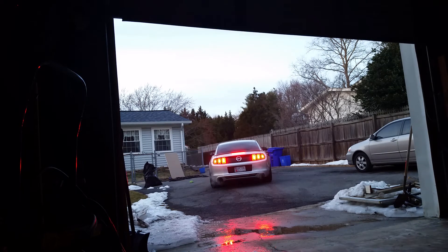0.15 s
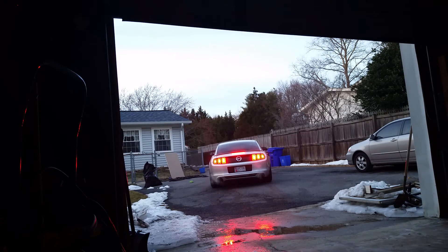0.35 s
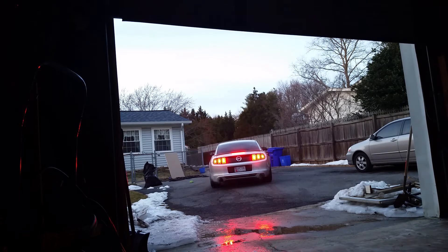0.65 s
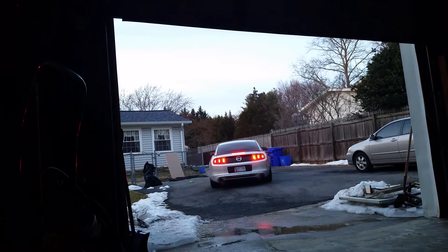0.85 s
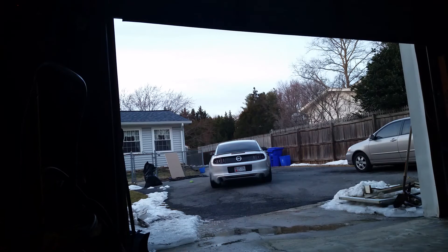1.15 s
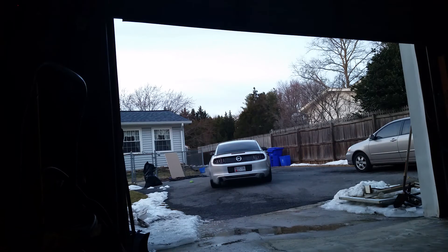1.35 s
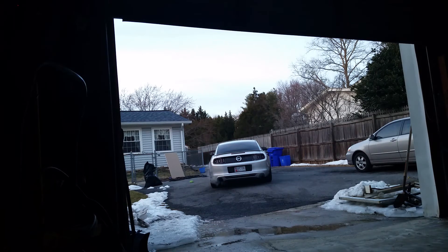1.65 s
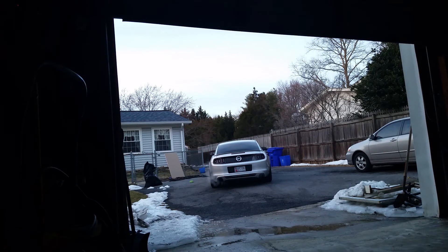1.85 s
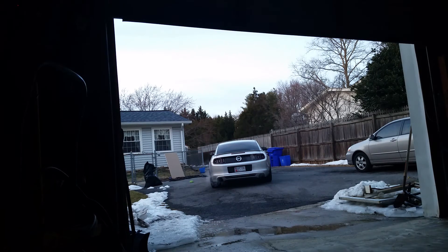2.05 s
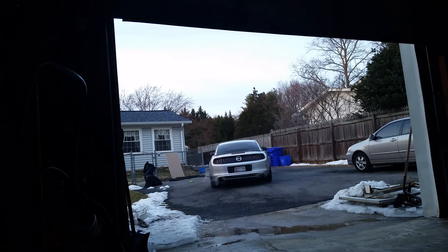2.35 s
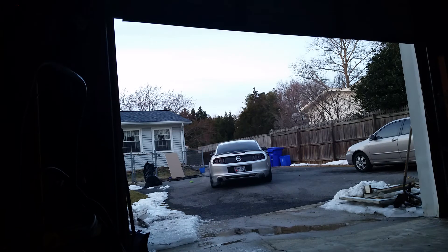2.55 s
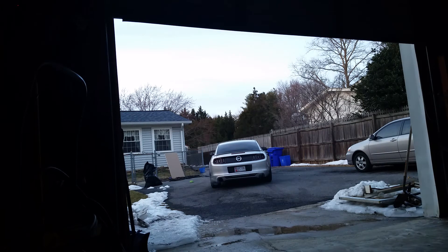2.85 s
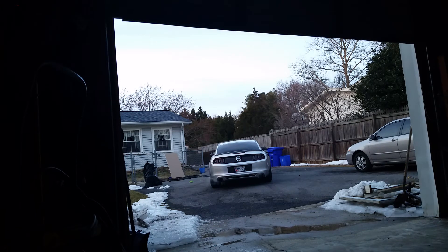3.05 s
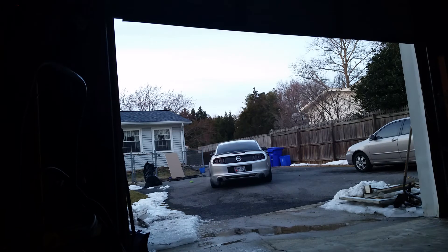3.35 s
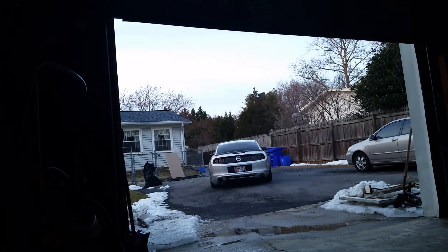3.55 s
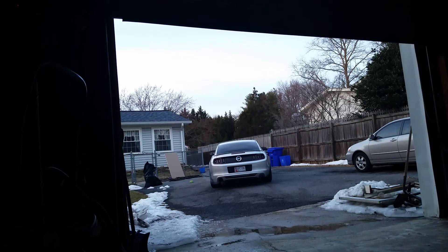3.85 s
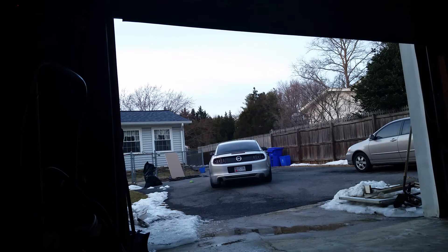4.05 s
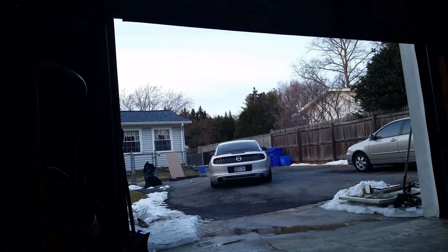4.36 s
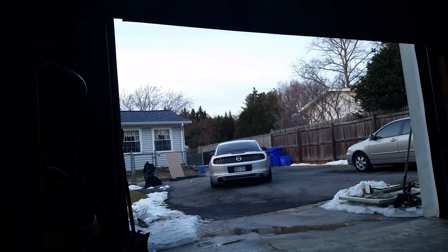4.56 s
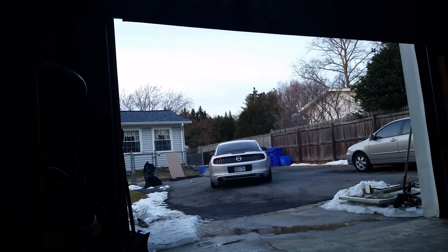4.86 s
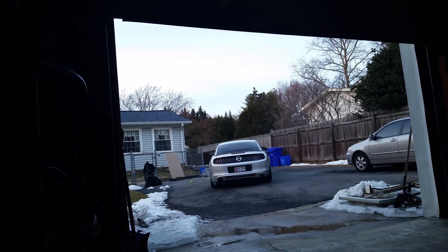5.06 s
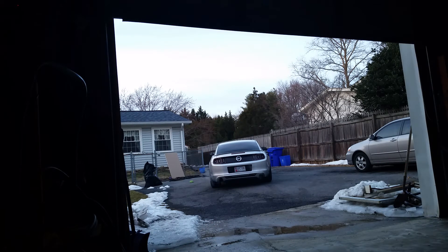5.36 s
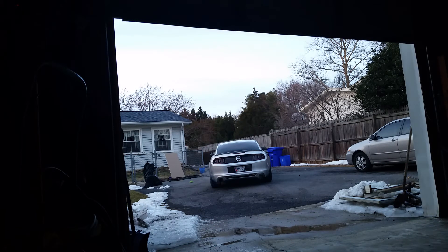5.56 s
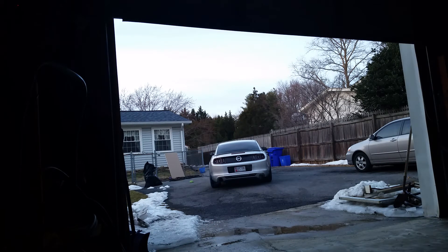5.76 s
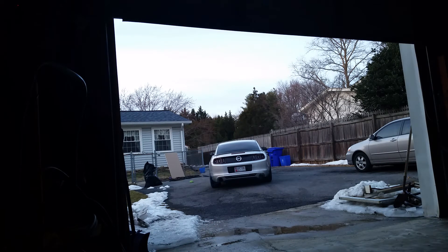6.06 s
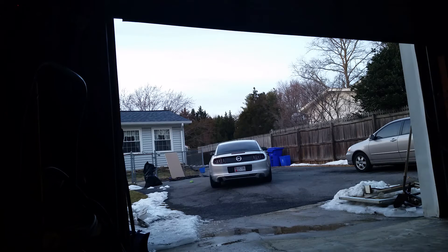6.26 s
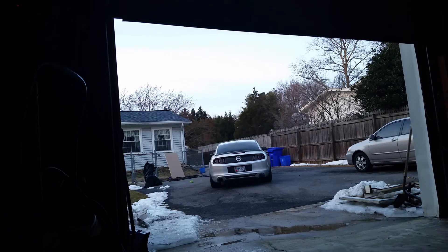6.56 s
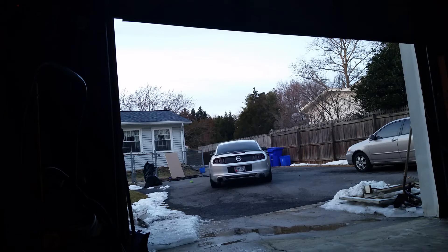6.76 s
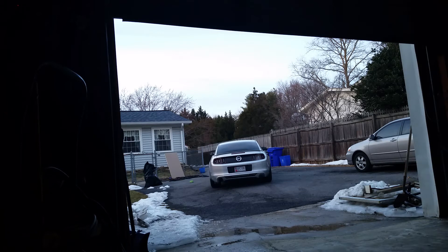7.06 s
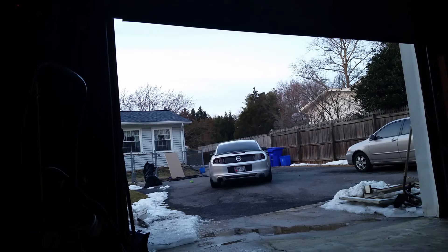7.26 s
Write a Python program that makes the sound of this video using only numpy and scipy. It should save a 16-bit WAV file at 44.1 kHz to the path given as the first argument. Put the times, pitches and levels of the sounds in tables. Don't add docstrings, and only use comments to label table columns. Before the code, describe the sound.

Heard from inside an open garage, a big eight-cylinder car in the driveway holds a fast, throaty idle for about two seconds, then slows to a steady lumpy rumble. Deep boom dominates, with uneven beats, dull exhaust roar, soft knocks and short hissing spits at the tailpipes. Low frequencies sit near the centre while roar and hiss spread wide; the engine runs throughout.

```python
import sys
import numpy as np
from scipy import signal
from scipy.fft import rfft, irfft, next_fast_len
from scipy.io import wavfile
from scipy.ndimage import uniform_filter1d

SR = 44100
rng = np.random.default_rng(int(sys.argv[2]) if len(sys.argv) > 2 else 0)


def unload_wav(signal):
    wavfile.write(
        sys.argv[1],
        SR,
        np.round(np.clip(np.atleast_2d(signal).T, -1, 1) * 32767).astype(np.int16),
    )


def amplitude_ratio(level_db):
    exponent = np.asarray(level_db, float) / 20
    return 10 ** exponent


N = 326781


def evened(x):
    return x / np.sqrt(np.mean(x ** 2) + 1e-20)


def read(points, hz):
    f, value = np.transpose(points)
    return np.interp(np.log(hz + 1), np.log(f + 1), value)


def curves(rows):
    s, *columns = np.transpose(rows)
    return [np.interp(np.arange(N) / SR, s, column) for column in columns]


def swells(rows):
    t = np.arange(0, N / SR + .01, .002)
    total_db = sum(db * np.exp(-((t - s) / half_s) ** 2) for s, db, half_s in rows)
    return np.interp(np.arange(N) / SR, t, total_db)


def settling():
    settle_s = 1
    return np.exp(-np.arange(N) / SR / settle_s)


def coloured(x, points, size=32768):
    log_gain = np.log(amplitude_ratio(read(points, abs(np.fft.fftfreq(size, 1 / SR)))))
    response = np.exp(np.conj(signal.hilbert(log_gain)))
    taps = np.fft.ifft(response).real[:size // 2]
    return evened(signal.oaconvolve(x, taps[None], axes=1)[:, :N])


# frequency in Hz, left minus right in dB.
TILT_DB = [(70, -2.7), (98, -1.6), (125, -.7), (170, -1.8), (240, .9), (340, 4.6), (500, 2.2), (1250, 3.6),
           (3500, .3), (5600, 0), (6600, -6), (7400, 7), (9000, 8), (9800, -.4)]
# frequency in Hz, left lead in radians.
LEAD_RAD = [(70, .08), (98, .24), (125, .19), (170, .05), (240, .34), (340, .42)]


def ports(x):
    size = next_fast_len(N + SR)
    hz = np.fft.rfftfreq(size, 1 / SR)
    half = amplitude_ratio(read(TILT_DB, hz) / 2) * np.exp(.5j * read(LEAD_RAD, hz))
    return irfft(rfft(x, size) * np.array([half, 1 / half]), size)[:, :N]


# frequency in Hz, correlation from 0 to 1.
LIKENESS = [(300, .9), (500, .74), (800, .64), (1250, .43), (1900, .05), (3500, .38), (11000, .2)]


def noise(points, patchy_db):
    frames, hz = N // 128 + 5, np.fft.rfftfreq(512, 1 / SR)
    a, b, c, d, patches = rng.standard_normal((frames, 257, 5)).T
    patches = uniform_filter1d(patches, size=5, axis=0)
    patches = evened(uniform_filter1d(patches, size=12, axis=1))
    same = np.clip(read(LIKENESS, hz), -1, 1)[:, None]
    left = a + 1j * b
    right = same * left + np.sqrt(1 - same ** 2) * (c + 1j * d)
    outside = (hz < points[0][0]) | (hz > points[-1][0])
    level_db = np.where(outside, -99, read(points, hz))[:, None]
    tilt_db = read(TILT_DB, hz)[:, None] * [[[.5]], [[-.5]]]
    z = np.array([left, right]) * amplitude_ratio(level_db + patchy_db * patches + tilt_db)
    return evened(signal.istft(z, nperseg=512, noverlap=384)[1][:, :N])


# time in seconds, firings a second.
SPEED = [(0.0, 41.47), (0.2, 43.39), (0.45, 46.07), (0.7, 47.06), (1.0, 47.65), (1.3, 48.38), (1.6, 48.99),
         (1.9, 48.18), (2.15, 48.19), (2.35, 45.07), (2.55, 41.93), (2.75, 41.17), (3.0, 41.23),
         (3.3, 41.39), (3.6, 41.97), (3.9, 42.02), (4.2, 42.03), (4.5, 42.23), (4.8, 41.83), (5.1, 42.02),
         (5.4, 41.96), (5.7, 41.53), (6.0, 41.82), (6.3, 42.05), (6.6, 42.62), (6.9, 42.47), (7.15, 42.56),
         (7.41, 43.98)]
CYLINDERS = [1.1, -0.59, 2.2, -0.25, 1.5, -0.79, -0.53, 1.5]


def firings():
    turned_at_start = .15
    count = np.cumsum(curves(SPEED)[0]) / SR + turned_at_start
    return count, np.flatnonzero(np.diff(np.floor(count)))


# time in seconds, load in dB, unevenness of the firing in dB.
ENGINE = [(0.0, -3.5, 1.5), (0.2, 1, -1), (0.45, -0.5, -1), (0.8, -1, 4), (1.15, 0, 1.5), (1.5, 0.5, 0.5),
          (1.9, 0, 1), (2.13, 0.5, 3), (2.4, 1.5, 3), (2.72, -1.5, 1), (3.42, 0.5, -1), (3.9, 0, -4.5),
          (4.75, -2, 0.5), (5.2, 0.5, -1), (5.6, 0, 1.5), (6.2, 0.5, -2), (6.6, -3.5, -5.5), (7.41, 4, 5)]
# time in seconds, level in dB, half length in seconds.
SURGES = [(.68, 3.5, 0.049), (.945, 6, 0.027), (1.54, 1, .07), (1.78, 2.5, .06), (2.05, 4.5, 0.093),
          (2.38, 1, 0.059), (2.76, 4.5, 0.069), (2.98, 4, 0.13), (3.18, 3, 0.082), (3.49, 4.5, 0.091),
          (4.03, 2, 0.087), (4.3, 3.5, 0.038), (4.53, 3, 0.043), (4.9, 6.5, 0.073), (5.29, 10, 0.051),
          (5.62, 6.5, 0.046), (5.86, 6, 0.065), (6.27, 6, 0.048), (6.47, 6.5, 0.048), (7.0, 5, 0.04),
          (7.28, 7, 0.045)]
# time in seconds, level in dB, half length in
# seconds.
THROBS = [(.08, 0, 0.045), (.24, 5.5, 0.025), (.35, 1, 0.035), (.59, 0.5, .02), (.68, -1, .02),
          (2.45, -0.5, .06), (2.8, 0, .06), (3.0, -1, .06), (3.41, 3, 0.072), (3.6, 2, 0.054),
          (3.8, 0.5, 0.039), (4.07, 2, 0.075), (4.2, -1.5, 0.042), (4.35, 1.5, .06), (4.6, 2, 0.081),
          (4.76, -2, 0.06), (4.9, 2, .06), (5.12, -1, 0.082), (5.3, -1, 0.066), (5.45, -1, .06),
          (5.62, 0, .05), (5.74, -2.5, 0.035), (5.88, 0.5, 0.067), (6.1, -0.5, .07), (6.26, -0.5, 0.052),
          (6.45, -0.5, 0.038), (6.6, 2, 0.029), (6.72, 3, 0.051), (6.83, -1.5, 0.083), (7.0, -2, 0.029),
          (7.15, -4, 0.077), (7.28, -5.5, .05), (7.34, -7, 0.028)]
CLEAN_ORDERS = [(10, 0.93), (11, 0.27), (16, 0.75), (18, 0.13), (19, 0.6), (20, 0.82), (21, 0.89),
                (22, 0.22), (24, 0.32), (26, 0.03), (34, 0.34)]
# firings a second, then the level of each clean order in dB.
ORDER_MAP = [(41.1, -52.5, -41.0, -22.5, -32.0, -25.5, -28.0, -17.5, -29.5, -22.0, -36.5, -42.0),
             (41.6, -52.5, -39.5, -26.0, -34.0, -43.5, -38.0, -27.5, -32.0, -26.0, -38.0, -43.0),
             (42.2, -57.0, -38.5, -25.0, -24.0, -36.5, -27.5, -34.5, -36.5, -28.5, -37.0, -43.0),
             (43.2, -45, -38, -26, -25, -33, -32, -31, -30, -31, -36, -50),
             (45, -39, -40, -27, -22, -36, -36, -30, -27, -38, -42, -50),
             (46.5, -37.0, -55.0, -18.5, -16.0, -33.0, -50.0, -24.0, -25.5, -41.5, -58.0, -60.5),
             (47.7, -34.0, -55.5, -13.0, -17.5, -45.5, -34.5, -26.5, -40.5, -30.0, -50.0, -61.5),
             (49.0, -42.5, -44.5, -11.5, -26.5, -44.0, -32.0, -32.0, -37.0, -37.5, -42.0, -61.0)]
# frequency in Hz, delay in turns.
PIPE_LAG = [(50, 0.0), (82, 0.75), (85, 0.76), (89, 0.94), (94, 0.67), (99, 0.59), (104, 1.1), (109, 1.13),
            (115, 0.82), (122, 1.17), (127, 1.25), (134, 0.9), (147, 0.86), (185, 2.66)]


def drone():
    rate = curves(SPEED)[0]
    level_db = curves(ENGINE)[0] + 0.56 * swells(SURGES) + swells(THROBS)
    speeds, *strengths = np.transpose(ORDER_MAP)
    cycles, out = firings()[0] / len(CYLINDERS), np.zeros(N)
    for (order, ahead), order_db in zip(CLEAN_ORDERS, strengths):
        gain = np.sqrt(2) * amplitude_ratio(level_db + np.interp(rate, speeds, order_db))
        shift = ahead - read(PIPE_LAG, order * rate / len(CYLINDERS))
        out += gain * np.cos(2 * np.pi * (order * cycles + shift))
    return out


def garage(x):
    t60_s, level_db, unlike = .35, 4, 0.2
    t = np.arange(SR // 2) / SR
    both, left, right = rng.standard_normal((3, len(t)))
    tail = (both + unlike * np.array([left, right])) * amplitude_ratio(-60 * t / t60_s)
    tail *= amplitude_ratio(level_db) / np.linalg.norm(tail[0])
    tail[:, 0] = 1
    size = next_fast_len(N + SR)
    answer = rfft(tail, size)
    flat = answer / np.sqrt((abs(answer) ** 2).mean(0) + 0.01)
    return irfft(rfft(x, size) * flat, size)[:, :N]


# frequency in Hz, level in dB.
BOOM = [(25, -77), (42, -16), (50, -29.5), (60, -2.5), (72, -10), (88, -12.5), (105, -4.5), (125, 3.5),
        (145, -8), (165, -4), (180, -5.5), (200, -25.5), (240, -61), (900, -160)]
# frequency in Hz, level in dB.
RING = [(90, -67.5), (190, -21.5), (205, -14), (215, -12), (225, -5), (232, -2), (240, -6.5), (250, -9.5),
        (270, 3), (290, -10.5), (312, -2.5), (328, -6), (345, -8.5), (385, -15), (430, -23), (520, -39.5),
        (1500, -150)]
# time in seconds, level in dB, half length in seconds.
BURBLES = [(0.02, 1, 0.038), (.18, -1.5, 0.083), (.3, 1.5, 0.066), (.5, 2, 0.032), (.72, 0, 0.12),
           (1.0, -1, 0.058), (1.2, 1, 0.027), (1.6, -1.5, 0.12), (2.277, 0, 0.03), (2.6, -1, 0.16),
           (3.1, 0.6, 0.48), (3.65, 0, 0.14), (4.0, 0, .06), (4.7, 0.5, 0.054), (5.5, -1, 0.049),
           (5.97, 1.5, 0.052), (6.555, 3, 0.042), (6.8, 1.5, 0.033), (7.06, 1.5, 0.04), (7.2, -0.5, 0.031),
           (7.38, 1, 0.056)]


def lope():
    at = np.r_[0, firings()[1]]
    kicks, beat = np.zeros((2, N))
    kicks[at] = np.resize(CYLINDERS, len(at)) + 0.84 * rng.standard_normal(len(at))
    beat[at] = 0.66
    uneven_db = curves(ENGINE)[1]
    boom_db = -27.5 + uneven_db + 0.09 * swells(SURGES) + .7 * swells(THROBS)
    ring_db = -40.5 + 0.3 * uneven_db + 7 * settling() + 4.3 * swells(BURBLES)
    boom = amplitude_ratio(boom_db) * coloured(garage(kicks), BOOM)
    return boom + amplitude_ratio(ring_db) * coloured(garage(kicks + beat), RING)


# start in seconds, peak in dB, ring in Hz.
KNOCKS = [(0.049, -36, 724), (0.319, -37, 750), (1.108, -41.5, 534), (2.185, -36, 577), (3.867, -44, 520),
          (4.937, -38.5, 587), (5.38, -41, 727), (5.601, -38, 558), (5.744, -42, 540), (6.178, -38, 512),
          (6.765, -40, 530), (6.911, -40, 550)]


def knocks():
    level_db, t60_s, rise_s = -5, .05, 0.00083
    t, out = np.arange(3000) / SR, np.zeros(N + SR)
    dull = signal.butter(2, [500, 1400], "bandpass", fs=SR)
    for s, db, hz in KNOCKS:
        puff = evened(signal.lfilter(*dull, rng.standard_normal(len(t))))
        blow = np.sin(2 * np.pi * hz * t) + 0.41 * puff
        envelope = amplitude_ratio(db + level_db - 60 * t / t60_s) * np.minimum(t / rise_s, 1)
        out[round(s * SR):][:len(t)] += envelope * blow
    return out[:N]


def puffs(lag_s, rise_s, fall_s, spread_db, echo):
    at, t, train = firings()[1], np.arange(2500) / SR, np.zeros(N + SR)
    size, echo_size, jitter = np.minimum(rng.standard_normal((3, len(at))), 1)
    at = at + round(lag_s * SR) + (0.0003 * SR * jitter).astype(int)
    train[at] = amplitude_ratio(spread_db * size)
    train[at + SR // 88] = echo * amplitude_ratio(spread_db * echo_size)
    shape = (1 - np.exp(-t / rise_s)) * np.exp(-t / fall_s)
    return evened(signal.oaconvolve(train, shape)[:N])


# frequency in Hz, density in dB per Hz.
ROAR_COLOUR = [(190, -46.5), (330, -7), (429, -11.5), (549, -5.5), (650, -18), (817, -8), (993, -18.5),
               (1310, -19.5), (1520, -27), (1800, -28.5), (1960, -38), (2180, -43), (2500, -62.5),
               (3250, -69), (5500, -120)]
# time in seconds, level in dB, half length in seconds.
ROAR_SWELLS = [
    (.32, -0.5, .04),
    (.66, 0.5, 0.046),
    (1.7, 2.5, 0.37),
    (2.19, 1.5, 0.045),
    (3.0, 1, 0.19),
    (7.13, 3.5, 0.059),
    (7.38, -1, .04),
]


def roar():
    flow = evened(2.0 + 0.82 * puffs(0.012, 0.0032, 0.0079, 3.8, echo=0.49))
    level_db = -47.5 + 0.2 * curves(ENGINE)[1] + 3 * settling()
    level_db += 0.57 * swells(BURBLES) + swells(ROAR_SWELLS)
    return amplitude_ratio(level_db) * flow * noise(ROAR_COLOUR, patchy_db=1.0)


# start in seconds, peak in dB, bright part against it in dB.
POPS = [(0.5662, -49, -18.5), (0.945, -44, -23), (1.28, -47, -17), (1.504, -48.5, -18),
        (1.5438, -45.5, -17), (1.6686, -51, -17.5), (1.709, -45, -15), (1.752, -50, -13),
        (1.9164, -41.5, -19), (2.0016, -42, -18), (2.0184, -46.5, -16), (2.0827, -44, -18.5),
        (2.2521, -47.5, -14), (2.4985, -48.5, -14), (2.596, -50.5, -18.5), (2.6907, -47, -18.5),
        (2.7132, -46, -20), (2.7374, -47, -14.5), (2.882, -44.5, -12.5), (2.981, -41, -16.5),
        (3.0528, -50, -6.5), (3.0801, -49, -6.5), (3.1262, -47, -9), (3.393, -54, -8.5),
        (3.4164, -49, -17.5), (3.4373, -44.5, -13.5), (3.5836, -49.5, -11), (3.751, -49.5, -12.5),
        (3.796, -53, -12.5), (3.823, -47.5, -14.5), (3.8442, -48, -13.5), (3.965, -52.5, -10.5),
        (4.3471, -51.5, -10), (4.4396, -50.5, -17.5), (4.5352, -50, -8.5), (4.819, -49, -18.5),
        (4.8662, -51.5, -14.5), (4.8926, -46, -13.5), (4.9395, -46, -12), (4.987, -50, -9),
        (5.2012, -49, -21.5), (5.2487, -46.5, -13.5), (5.2741, -43, -17.5), (5.3197, -46, -15),
        (5.5826, -49.5, -11.5), (5.631, -51, -10), (5.894, -48, -10.5), (6.276, -52, -17),
        (6.3516, -48, -20), (6.7262, -49.5, -15.5)]


def pops():
    low_db, high_db, rise_s, fall_s = -8, 2.5, 0.0016, 0.0024
    s, db, bright_db = np.transpose(POPS)
    t, trains = np.arange(2000) / SR, np.zeros((2, N))
    trains[:, (s * SR).astype(int)] = amplitude_ratio(np.array([db + low_db, db + bright_db + high_db]))
    shape = (1 - np.exp(-t / rise_s)) * np.exp(-t / fall_s)
    return signal.oaconvolve(trains, shape[None] / shape.max(), axes=1)[:, :N]


# time in seconds, level in dB.
FLOW = [
    (0.0, -7),
    (1.2, -2),
    (2.3, 2),
    (3.0, 3),
    (3.8, -0.5),
    (5.1, -3.5),
    (6.0, -3.5),
    (6.7, -7),
    (7.41, -6),
]
# frequency in Hz, density in dB per Hz.
SPIT_LOW = [(1240, -39.5), (2100, -18), (2410, -12.5), (2720, -4), (3390, -2), (3700, -9.5), (4260, -1.5),
            (4730, -7), (5400, -14.5), (6100, -22.5), (7800, -47.5), (13200, -120)]
# frequency in Hz, density in dB per Hz.
SPIT_HIGH = [(5500, -50.5), (6700, -22.5), (7200, -23.5), (7820, -11), (8500, -13), (9050, -22.5),
             (9500, -11), (10100, -8.5), (10900, -5), (11500, -2.5), (12500, -10.5), (13800, -12.5),
             (14500, -8.5)]
# frequency in Hz, density in dB per Hz.
HISS_COLOUR = [(1200, -25), (2000, -3.5), (2250, -8), (2900, -5.5), (4300, -6), (5200, -18), (5800, -30),
               (6200, -46), (7200, -46), (7700, -23.5), (9000, -26.5), (9700, -20), (11200, -15.5),
               (14500, -21)]


def spit():
    flow_db = curves(FLOW)[0] + swells(SURGES)
    steady_share = .3
    flow = evened(steady_share + puffs(0.0013, 0.002, 0.0088, 4.3, echo=0.22))
    low_pop, high_pop = pops()
    low = np.maximum(low_pop, flow * amplitude_ratio(-65.5 + flow_db))
    high = np.maximum(high_pop, flow * amplitude_ratio(-69 + 0.97 * flow_db))
    gas = low * noise(SPIT_LOW, patchy_db=2.0) + high * noise(SPIT_HIGH, patchy_db=1.0)
    return gas + amplitude_ratio(-63.5) * noise(HISS_COLOUR, patchy_db=2.5)


# time in seconds, frequency in Hz, level in dB.
HUM = [(0.0, 236, -31), (0.04, 233.2, -29.5), (0.08, 229.9, -37), (0.37, 232.7, -30), (0.84, 236.4, -33),
       (0.89, 233.3, -38.5), (2.13, 228.6, -41), (2.25, 238.8, -39), (2.35, 227.4, -40.5),
       (2.74, 237.1, -42), (2.87, 230.2, -38.5), (3.14, 237.5, -37.5), (3.24, 227.2, -40),
       (3.32, 228.7, -40), (5.59, 234.6, -44), (5.68, 228.5, -38.5), (7.35, 234.7, -42),
       (7.41, 227.2, -32.5)]


def hum():
    level_db, waver_hz, most_waver = -3, 7, .9
    hz, db = curves(HUM)
    r = np.exp(-np.pi * waver_hz / SR)
    a, b = evened(signal.lfilter([1], [1, -2 * r, r * r], rng.standard_normal((2, N))))
    share = most_waver * (1 - settling())
    waver = np.sqrt(1 - share) + np.sqrt(share / 2) * (a + 1j * b)
    tone = waver * np.exp(2j * np.pi * np.cumsum(hz) / SR)
    return np.sqrt(2) * amplitude_ratio(db + level_db) * tone.real


def whine():
    tone_hz, width_hz, level_db = 1931, 40, -71
    r = np.exp(-np.pi * width_hz / SR)
    chance = rng.standard_normal((2, N)) + 1j * rng.standard_normal((2, N))
    slow = signal.lfilter([1], [1, -2 * r, r * r], chance)
    carrier = np.exp(2j * np.pi * tone_hz * np.arange(N) / SR)
    return amplitude_ratio(level_db) * evened((slow * carrier).real)


# frequency in Hz, level in dB.
RUMBLE = [(14, -13), (25, -6), (33, 4.5), (42, 2), (55, -20), (90, -69.5), (400, -130)]


def rumble():
    return amplitude_ratio(-54.5) * coloured(rng.standard_normal((1, N)), RUMBLE)


def scene():
    engine = ports(drone() + lope()) + ports(knocks()) + roar() + spit()
    return engine + ports(hum()) + whine() + rumble()


def band_limit(x):
    return signal.sosfilt(signal.butter(12, 14640, fs=SR, output="sos"), x)


def record(dry):
    ceiling = 1.0
    mix = ceiling * np.tanh(dry / ceiling)
    return band_limit(mix)


dry = scene()
out = record(dry)
unload_wav(out)
```